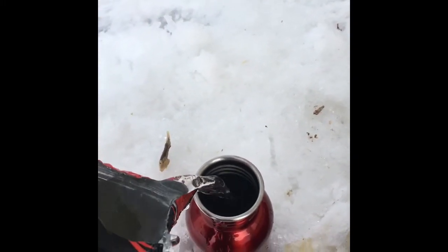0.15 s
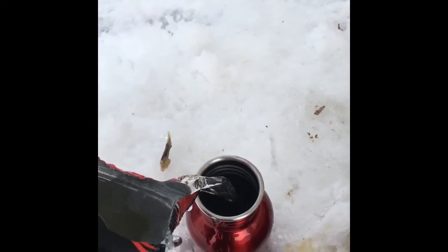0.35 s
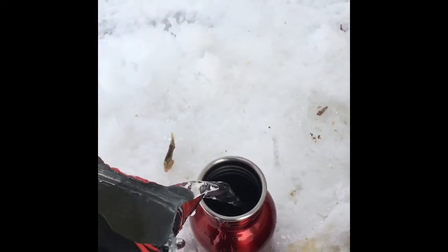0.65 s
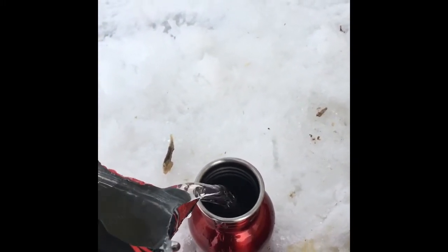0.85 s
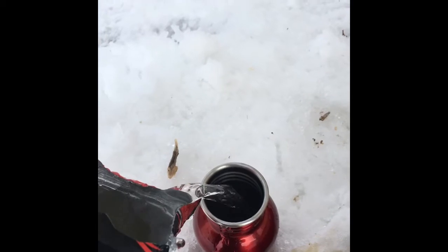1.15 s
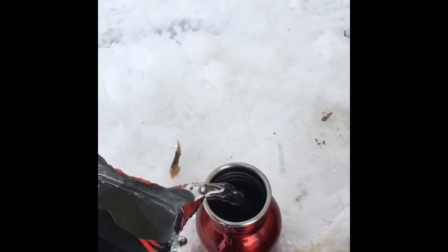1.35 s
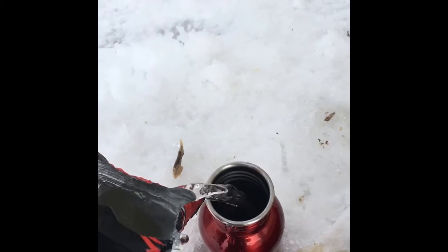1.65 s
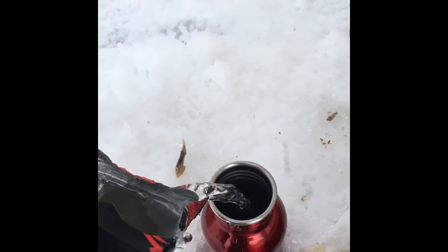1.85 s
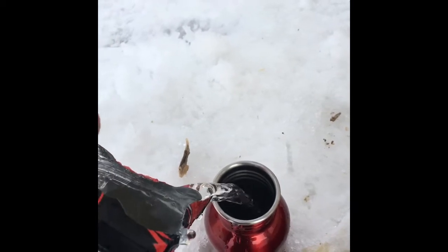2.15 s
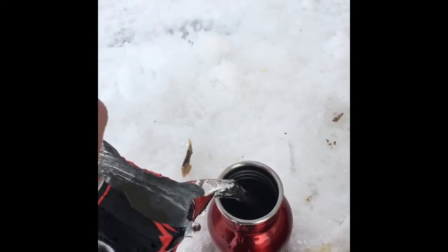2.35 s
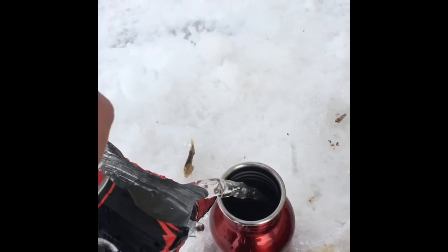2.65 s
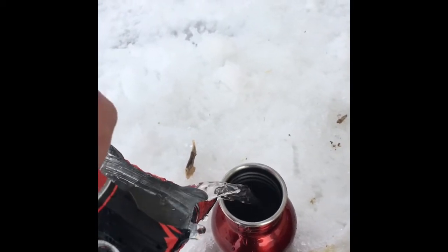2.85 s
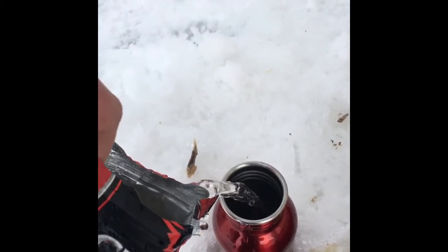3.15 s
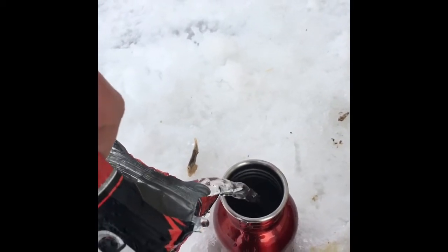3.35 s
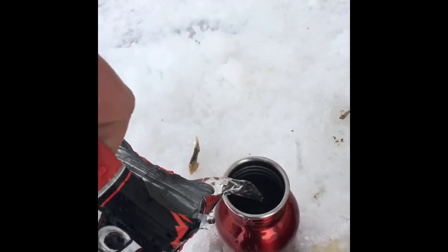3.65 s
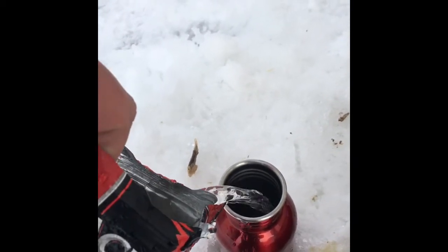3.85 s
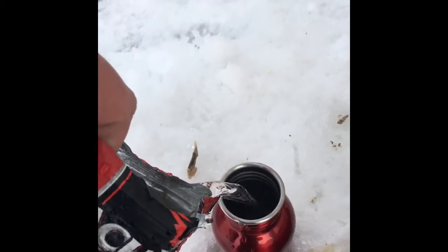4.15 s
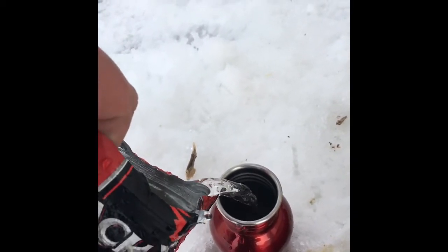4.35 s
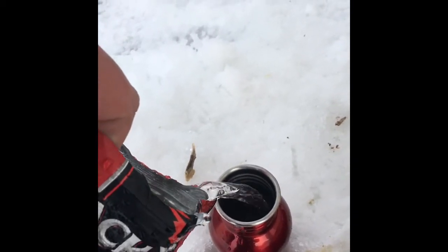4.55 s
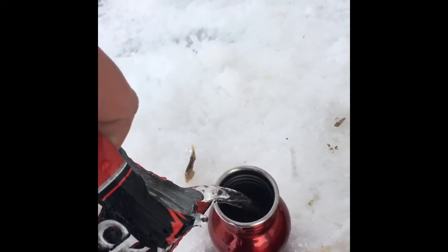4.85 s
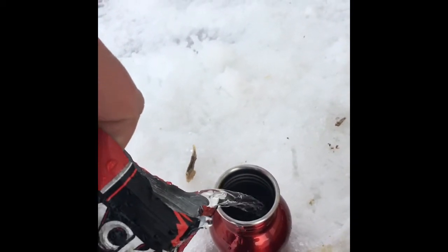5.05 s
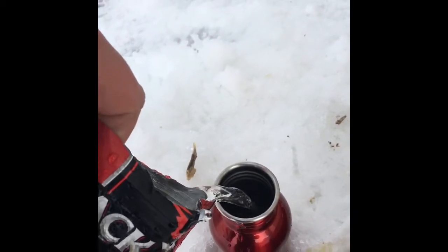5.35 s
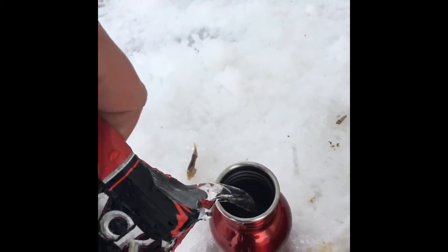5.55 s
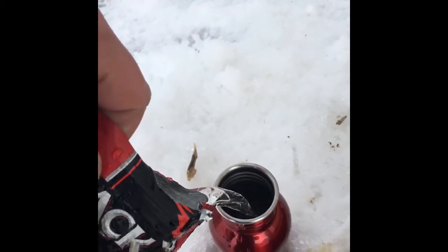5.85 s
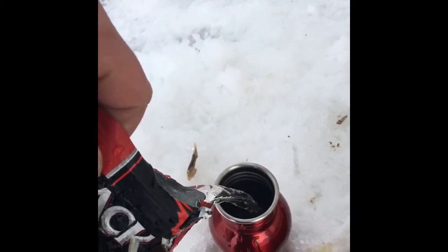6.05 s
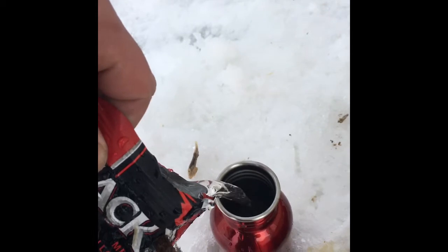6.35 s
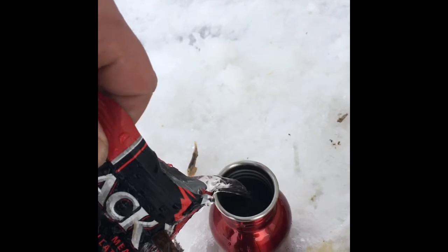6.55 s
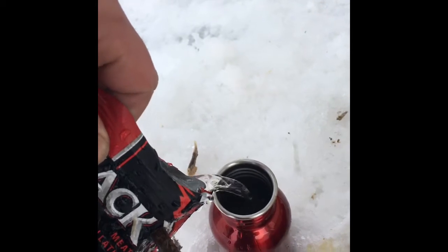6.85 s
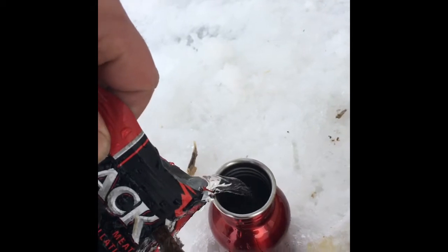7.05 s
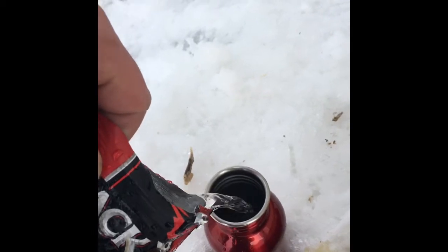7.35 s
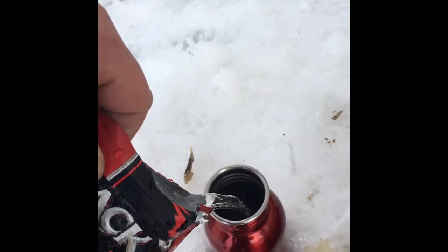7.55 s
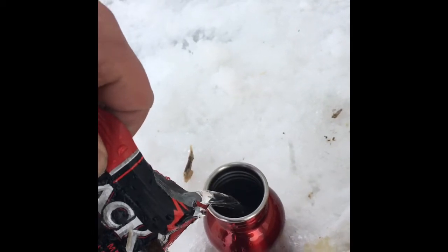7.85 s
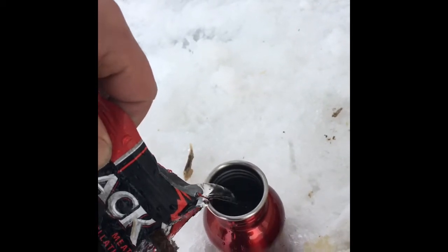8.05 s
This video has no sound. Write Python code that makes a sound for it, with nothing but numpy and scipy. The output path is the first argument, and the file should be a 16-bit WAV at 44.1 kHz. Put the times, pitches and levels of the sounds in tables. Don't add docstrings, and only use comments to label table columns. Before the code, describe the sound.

A thin, broken stream of water trickles and rings into a metal bottle outdoors, pitch rising, while wind gusts thump the microphone.

```python
import sys
import numpy as np
from scipy import signal
from scipy.fft import rfft, irfft, next_fast_len
from scipy.io import wavfile
from scipy.ndimage import map_coordinates

SR = 44100
rng = np.random.default_rng(int(sys.argv[2]) if len(sys.argv) > 2 else 0)


def volts_from_decibels(level):
    exponent = np.asarray(level, float) / 20
    return 10 ** exponent


def materialize(psi):
    bounded = np.clip(np.atleast_2d(psi).T, -1, 1)
    quanta = np.round(bounded * 32767).astype(np.int16)
    wavfile.write(sys.argv[1], SR, quanta)


N = 361179

# pitch in Hz, level in dB per Hz.
SPRAY = [(700, -80), (2000, 5), (4000, 5), (8000, -13), (16000, 2.5)]
MIST_THINS_DB_PER_S = 1


def stream():
    s, db, hz = drops()
    octaves = (0.74 + 0.33 * rng.uniform(-1, 1, (len(s), 1))).clip(.2, 2)
    tick = bursts(hz, octaves=octaves, t60=.013) + 0.43 * bursts(hz, octaves=0.084, t60=0.033)
    spat = placed(s, volts_from_decibels(db - 6.5)[:, None] * tick)

    plop_db = db - 24.0 + rng.normal(0, 3.1, len(s))
    plop = placed(s, volts_from_decibels(plop_db)[:, None] * bursts(np.full(len(s), 2800.), octaves=0.52, t60=0.039))

    when, pitch, size = scattered(s, count=1100, low_hz=5400, octaves=1.7, spread_db=21.5)
    droplets = placed(when, size * bursts(pitch, octaves=0.53, t60=0.045, size=512))
    when, pitch, size = scattered(s, count=1500, low_hz=3440, octaves=1.9, spread_db=17.5)
    fizz = placed(when, size * bubbles(pitch, cycles=19.0, size=640))
    mist_db = 6 * wobble(30) - MIST_THINS_DB_PER_S * np.arange(N) / SR
    mist = volts_from_decibels(mist_db) * coloured(rng.standard_normal(N), SPRAY)
    spray_db, gurgle_db = flow()
    spray = volts_from_decibels(spray_db + 1.5) * unit(unit(droplets) + 0.68 * unit(fizz) + 0.55 * unit(mist))

    when, pitch, size = scattered(s, count=1300, low_hz=1383, octaves=1.85, spread_db=10.5)
    round_bubble = bubbles(pitch, cycles=8.3, size=512) * np.linspace(1, 0, num=512)
    rough = bursts(pitch, octaves=0.73, t60=0.024, size=512)
    gurgle = placed(when, size * (round_bubble + 0.52 * rough))
    return spat + spray, plop + volts_from_decibels(gurgle_db - 3.5) * unit(gurgle)


# start in seconds, peak in dB, centre pitch in Hz.
DROPS = [(0.0159, -25.5, 7100), (0.1208, -20, 5650), (0.2012, -19.5, 7500), (0.301, -21.5, 6650),
         (0.845, -13, 8940), (0.9168, -17.5, 8900), (0.938, -19, 4500), (1.075, -18, 6000),
         (1.2179, -21.5, 8700), (1.2552, -18.5, 6300), (1.621, -18.5, 7000), (1.8066, -22.5, 5400),
         (2.0943, -24, 7500), (2.8021, -13, 5230), (3.0784, -20.5, 8050), (3.146, -20, 6600),
         (3.1901, -18.5, 5580), (3.299, -19, 6260), (3.4185, -18.5, 8900), (3.5395, -18.5, 7700),
         (3.7328, -20.5, 5040), (3.8591, -21.5, 4260), (4.385, -24, 7900), (4.9003, -18, 7700),
         (5.462, -19, 6600), (5.8857, -20.5, 9000), (6.123, -21, 5740), (6.6692, -24, 4060),
         (7.0829, -10, 5400), (8.0038, -23.5, 6440)]
# start in seconds, peak in dB.
SPITS = [(0.0786, -11), (0.1714, -24.5), (0.2395, -21), (0.5072, -23), (0.8183, -14), (1.045, -25),
         (1.765, -23), (2.36, -24), (2.4075, -21.5), (3.3712, -17.5), (4.374, -22), (4.4242, -19.5),
         (4.7487, -22), (4.8726, -17.5), (5.1433, -18.5), (5.3913, -19.5), (5.8508, -24), (6.1872, -18),
         (6.3967, -23.5), (6.7474, -22), (6.9277, -24), (6.9664, -22), (7.3716, -20), (7.4129, -14),
         (7.892, -27), (7.9344, -30), (7.962, -11.5), (5.907, -20), (6.0564, -23.5), (8.113, -24)]
SPIT_HZ, SPIT_SPREAD = 11700, 0.16
BREAK_S, BREAK_JITTER = .044, .32
DRIP_DB, DRIP_SPREAD_DB = 21.5, 4.5


def drops():
    s, db = np.transpose(SPITS)
    spit_hz = SPIT_HZ * (1 + SPIT_SPREAD * rng.uniform(-1.13, 1, len(s)))
    loud = np.hstack([np.transpose(DROPS), [s, db, spit_hz]])
    marks = np.sort(np.r_[loud[0], N / SR])
    gaps = []
    for a, b in zip(marks, marks[1:]):
        pieces = max(round((b - a) / BREAK_S), 1)
        gaps.append(np.linspace(a, b, pieces + 1)[1:-1])
    s = np.concatenate(gaps)
    late, size, pick = rng.standard_normal((len(s), 3)).T
    s = s + BREAK_JITTER * BREAK_S * late
    tones = np.r_[np.transpose(ACROSS)[0][1:], SPIT_HZ]
    hz = tones[(np.abs(pick) * 1000).astype(int) % len(tones)]
    db = flow()[0][(s * SR).astype(int)] + DRIP_DB + DRIP_SPREAD_DB * size
    return np.hstack([loud, [s, db, hz]])


# time in seconds, spray in dB, gurgle in dB.
FLOW = [
    (0.0, -44, -45),
    (0.32, -48.5, -48),
    (3.67, -47, -54.5),
    (4.79, -49.5, -56.5),
    (4.97, -44, -55.5),
    (5.31, -51.5, -55),
    (5.68, -49, -50),
    (6.38, -53.5, -55),
    (7.25, -52, -54.5),
    (8.19, -54.5, -52),
]
# middle in seconds, half length in seconds, change in dB.
STALLS = [(0.502, 0.087, -7.5), (1.013, 0.023, -6.5), (1.325, 0.029, -4), (1.87, 0.023, -6),
          (2.212, 0.036, -8), (2.468, 0.033, -4), (2.967, 0.043, -6.5), (3.97, 0.16, -5.5),
          (4.664, 0.038, -10.5), (5.29, .06, -4), (5.83, .03, -3), (6.0, 0.037, -11), (6.27, 0.038, -3.5),
          (6.517, .05, -4), (6.9, 0.02, -5), (6.993, 0.023, -9), (7.738, 0.042, -5.5), (8.066, 0.037, -6)]


def flow():
    t = np.arange(0, N + 64, 64) / SR
    s, half, db = np.transpose(STALLS)[:, :, None]
    dips = np.sum(db * np.exp(-((t - s) / half) ** 2), 0)
    dip_db = np.interp(np.arange(N) / SR, t, dips)
    spray_db, gurgle_db = curves(FLOW)
    return spray_db + dip_db, gurgle_db + 0.45 * dip_db


def scattered(falls, count, low_hz, octaves, spread_db):
    which, wait, free, pitch, size = rng.random((count, 5)).T
    parent = falls[(which * len(falls)).astype(int)]
    trailing = np.minimum(parent - .015 * np.log(wait), N / SR)
    when = np.where(free < .68, which * N / SR, trailing)
    return when, low_hz * 2 ** (octaves * pitch), volts_from_decibels(spread_db * (size ** 2 - 1))[:, None]


# time in seconds, neck-to-water mode in Hz, half-wave of the air in Hz.
FILL = [
    (0, 1440, 1490),
    (2, 1680, 1825),
    (3.2, 1870, 2085),
    (4.2, 2030, 2325),
    (5.1, 2200, 2690),
    (5.8, 2350, 2905),
    (8.19, 2880, 3700),
]
# time in seconds, neck mode in dB, joined modes in dB,
# lone modes in dB.
RING = [
    (0, -2, -2, 1.5),
    (3, 2, 0, -2),
    (6, -2, -9.5, -1),
    (6.6, 3, -21, -2.5),
    (8.19, -26, -15, -9),
]
# pitch in Hz, dB alone, dB with one half-wave, dB with two.
ACROSS = [(2740, 8.5, 8, -9), (4590, -0.5, -9, -1), (5550, -0.5, -1, 0), (6530, -3.5, -17, -2),
          (7200, 2, -3, 5), (8630, -1, 6, 6)]
# pitch in Hz, level in dB.
MOUTH = [(1000, 2.5), (2200, -6), (3600, 0.5), (5000, -5), (6000, -1), (9000, -0.5), (10300, -1.5),
         (12000, 1.5), (16000, -1)]


def bottle(bright, dull):
    neck_hz, half_hz = curves(FILL)
    neck_db, joined_db, alone_db = curves(RING)
    swash_colour = [(600, -40), (1300, 0.5), (4000, -11.0), (9000, -10.5), (16000, -35)]
    swash = unit(coloured(rng.standard_normal(N), swash_colour))
    churn = volts_from_decibels(flow()[1] - 5.0 + 2.5 * wobble(28)) * swash
    drive = 0.4 * bright + dull + churn

    def wandering():
        return volts_from_decibels(4.85 * wobble(20)) * drive

    ring = volts_from_decibels(6.5 + neck_db) * resonant(wandering(), neck_hz * (1 + 0.0055 * wobble(9)), width_hz=58)
    wall_hz = 1810 - 25 * np.arange(N) / SR
    ring += volts_from_decibels(0.5) * resonant(drive, wall_hz, width_hz=5)
    for hz, *levels in ACROSS:
        for n, db in enumerate(levels):
            mode_db = db + (joined_db if n else alone_db)
            mode_hz = np.hypot(hz, n * half_hz)
            ring += volts_from_decibels(mode_db) * resonant(wandering(), mode_hz, width_hz=0.012 * hz)
    return coloured(0.71 * bright + 0.76 * dull, MOUTH) + ring


# start in seconds, peak in dB.
GLUGS = [(3.334, -35), (4.299, -46), (4.733, -49.5), (4.93, -49), (5.033, -46.5), (5.378, -53.5),
         (5.53, -48), (5.645, -53), (5.47, -45.5), (5.91, -46), (6.19, -46)]
# start in seconds, peak in dB, pitch in Hz.
PLOPS = [(0.0897, -30, 2740), (0.4329, -29, 1454), (0.9398, -22, 4240), (1.2242, -29.5, 2710),
         (1.6247, -27, 3350), (1.6987, -29.5, 3760), (2.386, -29, 1752), (2.597, -34, 3870),
         (3.458, -31, 3510), (3.521, -32, 1935), (4.0541, -36.5, 3550), (4.3214, -28.5, 2050),
         (4.3873, -29, 3560), (4.9262, -30.5, 2180), (5.6002, -34, 3150), (7.1756, -35, 4630),
         (7.7357, -25, 3120), (7.8435, -32, 3780), (7.9618, -43, 3230)]


def glugs():
    s, db = np.transpose(GLUGS)
    puff = bursts(np.full(len(s), 480.), octaves=0.35, t60=0.22, size=4096)
    puffs = placed(s, volts_from_decibels(db + 12.5)[:, None] * puff)
    draught = coloured(rng.standard_normal(N), [(100, -62), (300, -11.5), (700, -3.0), (2000, -77)])
    puffs += volts_from_decibels(-50.5 + 4.6 * wobble(14)) * unit(draught)
    tone = resonant(puffs, 9.1 * np.sqrt(curves(FILL)[1]), width_hz=50.5)

    s, db, hz = np.transpose(PLOPS)
    plop = bubbles(hz, cycles=13.8) + 0.34 * bursts(hz, octaves=0.24, t60=0.034)
    return tone + placed(s, volts_from_decibels(db - 4)[:, None] * plop)


# pitch in Hz, level in dB.
BUFFET = [
    [(15, -54), (30, -8.5), (60, 2.5), (130, -5.5), (300, -40.5), (800, -120)],
    [(40, -60), (90, -14.5), (160, 3.5), (300, -5.5), (600, -17.5), (1200, -40.5), (3000, -120)],
]


def wind():
    wind_db, flutter_db = gusts()
    rumble, flutter = (coloured(rng.standard_normal(N), colour) for colour in BUFFET)
    shared = np.tanh(wobble(30))
    rumble = volts_from_decibels(wind_db) * unit(volts_from_decibels(2 * shared) * rumble)
    lumps_db = 4.6 * shared + 8.0 * np.tanh(wobble(60))
    flutter = volts_from_decibels(flutter_db - 2) * unit(volts_from_decibels(lumps_db) * flutter)

    s, db, hz = eddies(flutter_db)
    t = (np.arange(2048) - 1024) / SR
    turns = hz[:, None] * t
    start, twist, kink = rng.uniform(-1.1, 1, (len(s), 3)).T[:, :, None]
    swirl = np.cos(2 * np.pi * turns * (1 + 0.31 * twist * turns) + np.pi * start)
    swirl *= np.exp(-(turns / 0.68) ** 2)
    edge = np.cos(2 * np.pi * 2.3 * turns + np.pi * kink) / np.cosh((turns + 0.35) / 0.16)
    slap = np.cos(2 * np.pi * 600 * t + np.pi * twist) / np.cosh(t / 0.00048 + 0.67)
    thump = swirl + 0.41 * edge + volts_from_decibels(1.03 * db[:, None] + 2.5) * slap
    begin = np.maximum(s + 0.00397 - 1024 / SR, 0)
    return rumble + flutter + placed(begin, volts_from_decibels(db + 4.0)[:, None] * thump)


# peak time in seconds, wind in dB, swell time in seconds, flutter in dB above the wind.
GUSTS = [(0.15, -30, 0.9, -5.5), (0.56, -21.5, 0.06, -0.5), (0.912, -21.5, 0.057, 2),
         (1.13, -26.5, 0.072, -6), (1.59, -30, 0.057, -6), (1.968, -18.5, 0.071, -4), (2.1, -24, 0.015, 2),
         (2.291, -23, 0.041, 0.5), (2.528, -24.5, 0.074, -1), (2.89, -22.5, 0.072, 1),
         (3.03, -25, 0.083, 0), (3.31, -31, 0.073, -10.5), (3.76, -22.5, 0.074, 1),
         (3.97, -24.5, 0.076, -5), (4.361, -27, 0.081, -2.5), (4.55, -31, 0.068, 0.5),
         (4.83, -30.5, 0.055, -4), (5.18, -33, 0.089, -10.5), (5.691, -21.5, 0.046, -8.5),
         (5.89, -31, 0.039, -15), (6.01, -32, 0.037, -10.5), (6.191, -26.0, 0.018, -8.5),
         (6.36, -34.5, 0.029, -7.5), (6.65, -24, 0.079, -5), (6.89, -22.5, 0.083, -4.5),
         (7.2, -25, 0.083, -4), (7.472, -20, 0.06, 1), (7.65, -27, 0.017, 0), (7.828, -20.5, 0.055, -5.5),
         (8.09, -22.5, 0.017, -8)]
FLUTTER_NARROWS = 1.51
LULL_DB, LULL_FLUTTER_DB = -66, -58.5
RISE_SHARE, SHOULDER = 0.94, 1.083


def gusts():
    t = np.arange(0, N + 64, 64) / SR
    s, db, swell, over_db = np.transpose(GUSTS)[:, :, None]
    away = np.abs(t - s) / swell / np.where(t < s, RISE_SHARE, 1)
    u = np.clip(away, 0, 20) ** SHOULDER
    body = np.sum((volts_from_decibels(db) / np.cosh(u)) ** 2, 0)
    body = np.sqrt(body + volts_from_decibels(LULL_DB) ** 2)
    core = np.sum((volts_from_decibels(db + over_db) / np.cosh(FLUTTER_NARROWS * u)) ** 2, 0)
    core = np.sqrt(core + volts_from_decibels(LULL_FLUTTER_DB) ** 2)
    return [np.interp(np.arange(N) / SR, t, 20 * np.log10(v)) for v in (body, core)]


# middle in seconds, peak in dB, pitch in Hz.
EDDIES = [(0.022, -18.5, 185), (1.553, -22.5, 170), (0.513, -19, 224), (0.551, -12, 248), (0.599, -16, 324),
          (0.91, -16, 186), (1.102, -20, 170.2), (1.893, -16.5, 157), (1.935, -14.5, 406), (1.989, -9, 232),
          (2.099, -16.5, 199), (2.245, -18, 150), (2.535, -15, 162), (2.874, -13, 307), (2.912, -10.5, 162),
          (3.144, -22, 260), (3.015, -15.5, 150), (6.59, -20, 187), (3.783, -13.5, 187),
          (4.047, -18.5, 367), (7.651, -23.5, 200), (5.677, -19.5, 151), (6.888, -15.5, 155),
          (8.067, -17.5, 158), (7.21, -16, 150), (7.371, -19, 253), (7.425, -13.5, 140), (7.453, -13, 230),
          (7.485, -15, 365), (7.807, -20.5, 192)]
SMALL_EDDY_DB, SMALL_EDDY_HZ = 9, 150


def eddies(flutter_db, count=90):
    when, size, pitch = rng.random((count, 3)).T
    when = (np.arange(count) + when) / count
    db = flutter_db[(when * N).astype(int)] + SMALL_EDDY_DB - 6 * size
    hz = SMALL_EDDY_HZ * 2 ** (1.2 * pitch ** 2)
    return np.hstack([np.transpose(EDDIES), [when * N / SR, db, hz]])


# start in seconds, peak in dB, pitch in Hz.
SNAPS = [
    (6.0575, -29.5, 1200),
    (6.334, -34, 2240),
    (6.6715, -32.5, 1040),
    (7.0844, -20.5, 913),
    (7.3088, -13, 1280),
]


def bag():
    s, db, hz = np.transpose(SNAPS)
    t = np.arange(1024) / SR
    knock = np.sin(2 * np.pi * hz[:, None] * t) * volts_from_decibels(-60 * t / 0.0079)
    knock = knock + 0.35 * np.sin(2 * np.pi * 2900 * t) * volts_from_decibels(-60 * t / 0.007)
    crack = bursts(1.7 * hz, octaves=0.91, t60=0.014)
    return placed(s, volts_from_decibels(db + 5.5)[:, None] * (knock + 0.41 * crack))


# pitch in Hz, level in dB per Hz.
FAR = [(120, -32), (200, 1), (334, -9), (1120, -0.5), (1770, -22.5), (2750, -14), (4950, -51),
       (12200, -32.5), (16000, -22)]


def far():
    return volts_from_decibels(-56.5 + 0.77 * wobble(7.8)) * unit(coloured(rng.standard_normal(N), FAR))


def bursts(hz, octaves, t60, size=1024):
    t = np.arange(size) / SR
    f = np.fft.rfftfreq(size, 1 / SR) + 1
    band = np.exp(-(np.log2(f / hz[:, None]) / octaves) ** 2 / 2)
    noise = irfft(rfft(rng.standard_normal((len(hz), size))) * band)
    noise /= np.std(noise, axis=1, keepdims=True)
    return noise * volts_from_decibels(-60 * t / t60) * (1 - np.exp(-t / 0.00034))


def bubbles(hz, cycles, size=1024):
    turns = hz[:, None] * np.arange(size) / SR
    slide = rng.normal(.004, .008, (len(hz), 1))
    tone = np.sin(2 * np.pi * turns * (1 + slide * turns / cycles))
    return tone * np.exp(-turns / cycles) * (1 - np.exp(-turns / 0.5))


def resonant(x, hz, width_hz):
    turn = np.exp(2j * np.pi * np.cumsum(np.broadcast_to(hz, N)) / SR)
    pole = np.exp(-np.pi * width_hz / SR)
    return 2 * np.real(turn * signal.lfilter([1 - pole], [1, -pole], x * turn.conj()))


def placed(s, grains):
    at = np.round(s * SR).astype(int)[:, None] + np.arange(grains.shape[1])
    return np.bincount(at.ravel(), grains.ravel(), N + grains.shape[1])[:N]


def coloured(x, points):
    m = next_fast_len(N + 8192)
    return irfft(rfft(x, m) * volts_from_decibels(along(points, np.fft.rfftfreq(m, 1 / SR))), m)[:N]


def along(points, hz):
    f, v = np.transpose(points)
    return np.interp(np.log(hz + 1), np.log(f + 1), v)


def curves(rows):
    s, *cols = np.transpose(rows)
    return [np.interp(np.arange(N) / SR, s, c) for c in cols]


def wobble(rate):
    at = np.arange(0, N + 32, 32)
    knots = rng.standard_normal(int(N * rate / SR) + 4)
    return np.interp(np.arange(N), at, map_coordinates(knots, [at * rate / SR]))


def unit(x):
    return x / np.sqrt(np.mean(x ** 2) + 1e-20)


def scene():
    return (wind() + bottle(*stream()) + glugs() + bag() + far())[None]


def low_pass(x):
    return signal.sosfilt(signal.butter(12, 16840, fs=SR, output="sos"), x)


def record(dry):
    edge = [(15, -20), (28, -5), (40, 0), (15650, 0), (15750, -22), (16750, -34), (16850, -80)]  # (Hz, dB)
    return low_pass(coloured(dry[0], edge)[None])


dry = scene()
out = record(dry)
materialize(out)
```